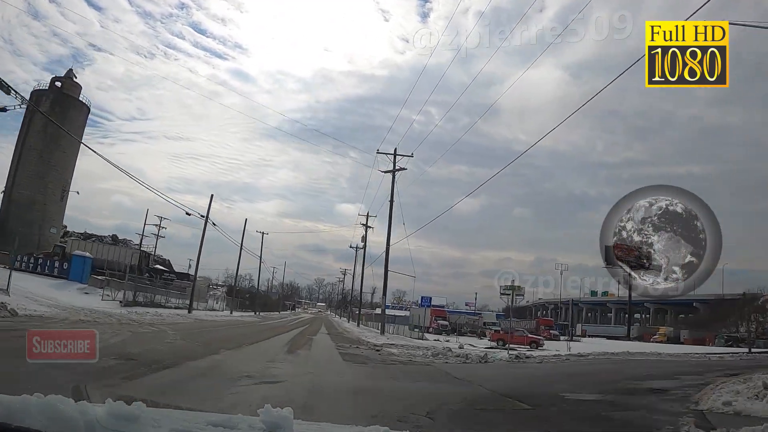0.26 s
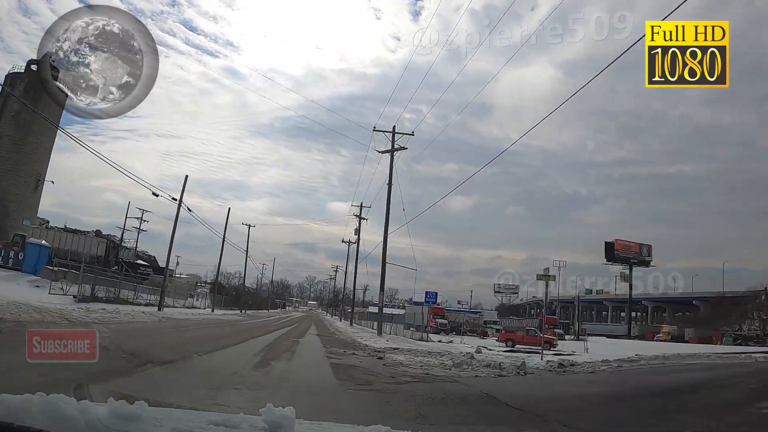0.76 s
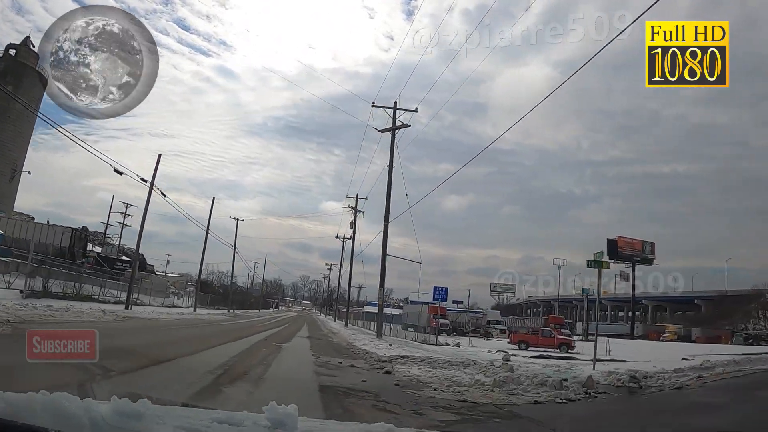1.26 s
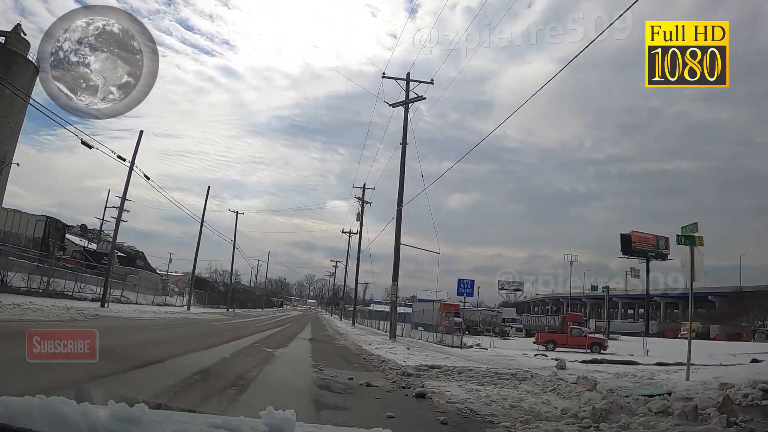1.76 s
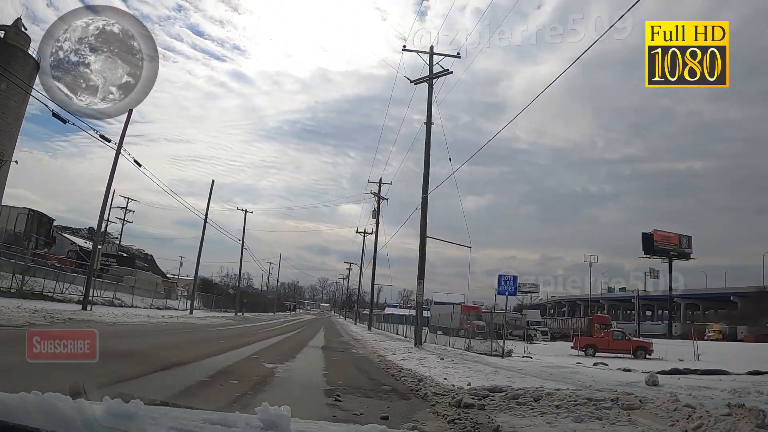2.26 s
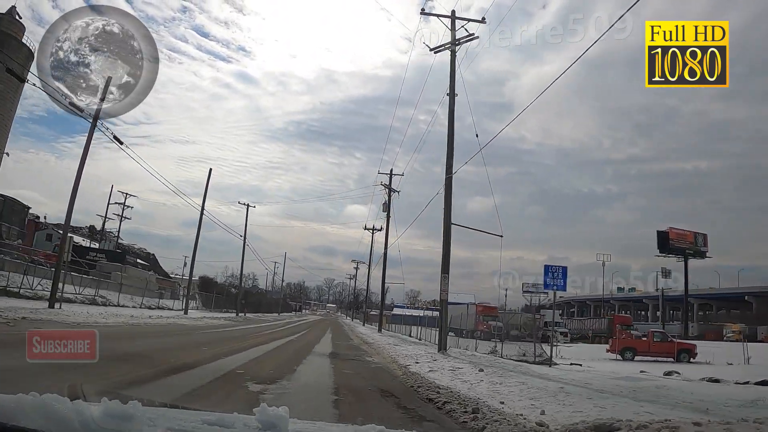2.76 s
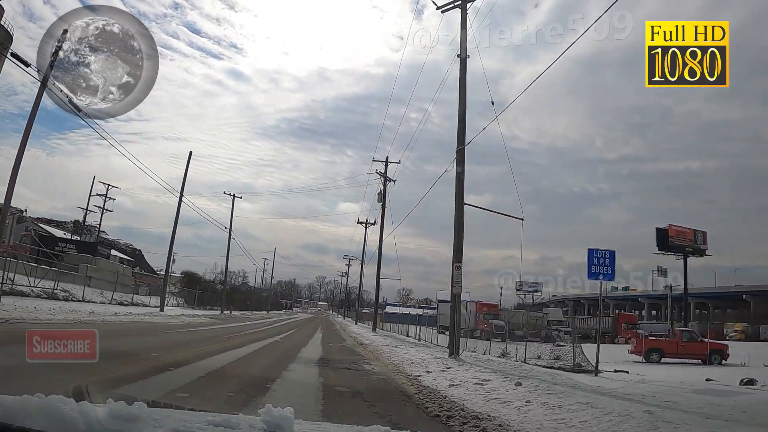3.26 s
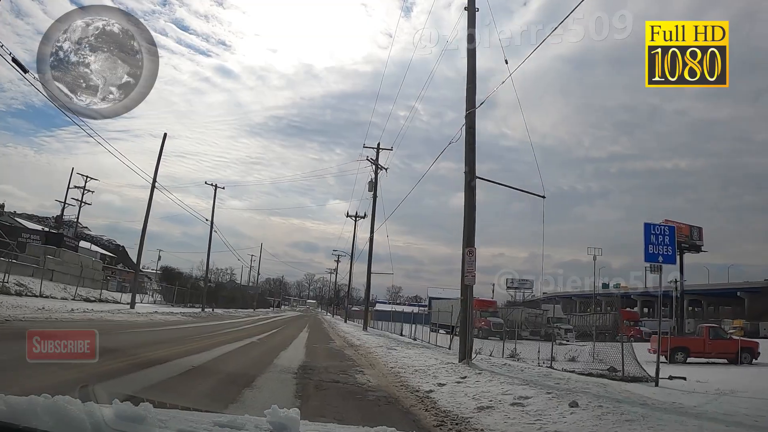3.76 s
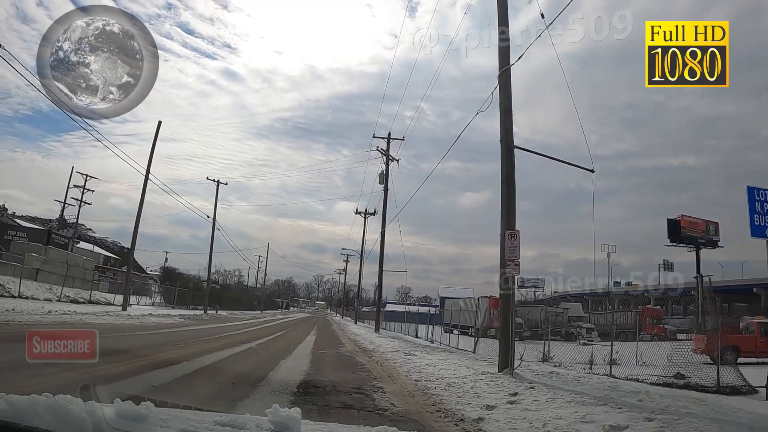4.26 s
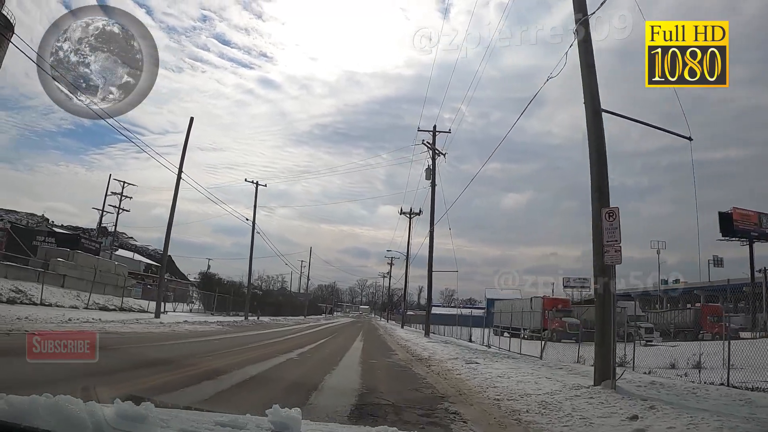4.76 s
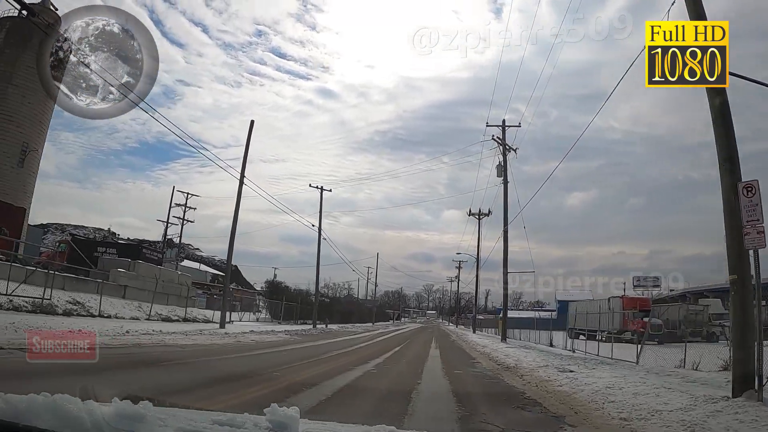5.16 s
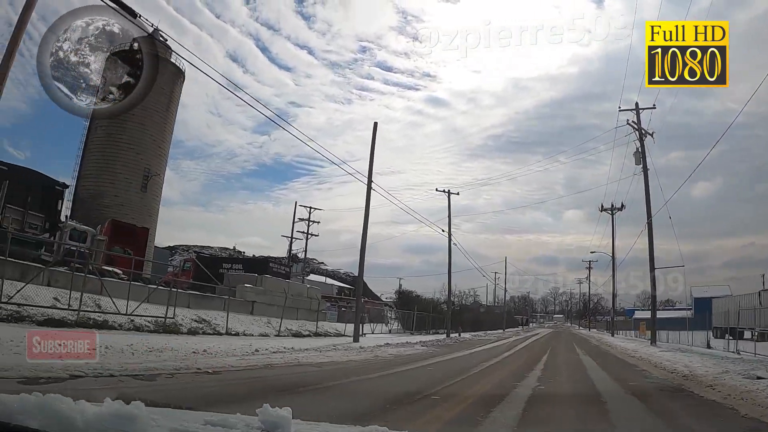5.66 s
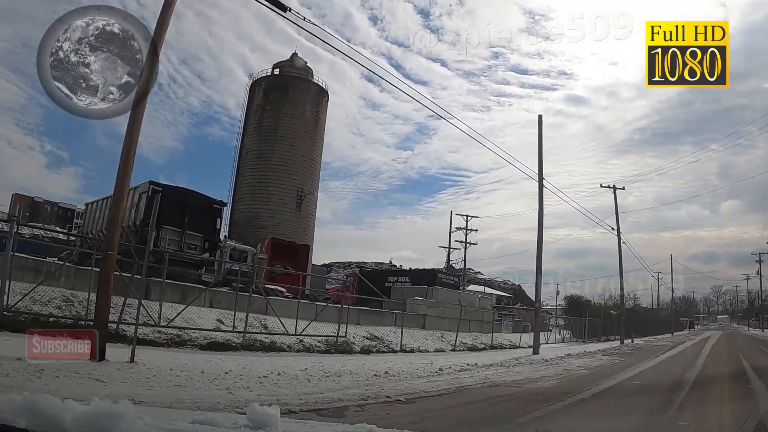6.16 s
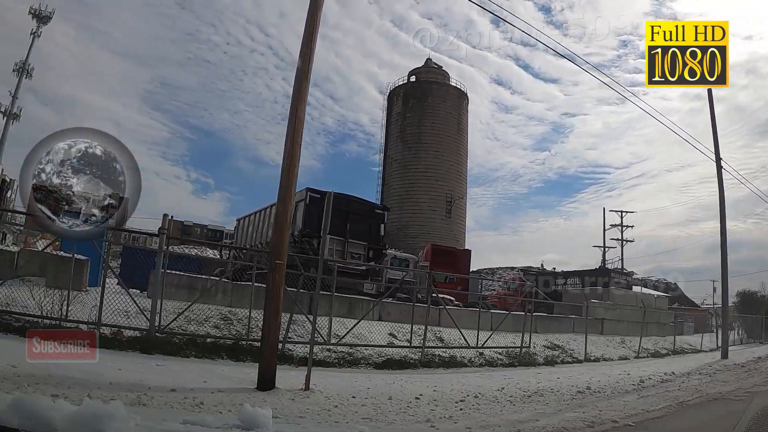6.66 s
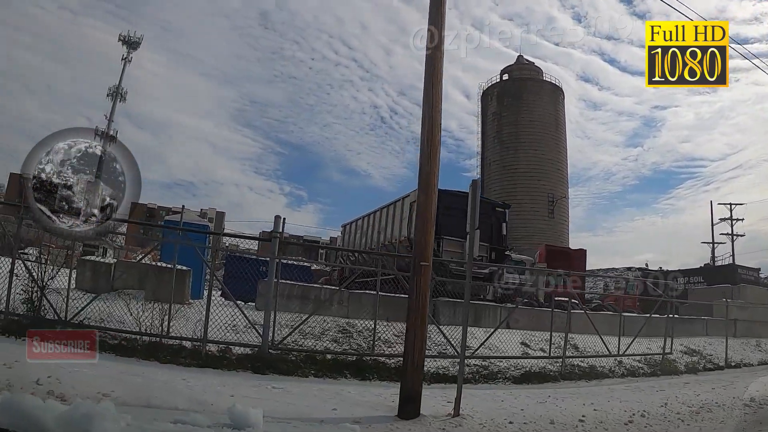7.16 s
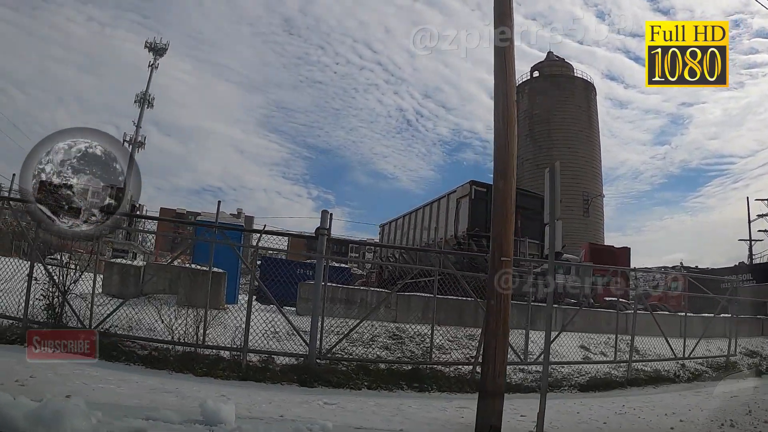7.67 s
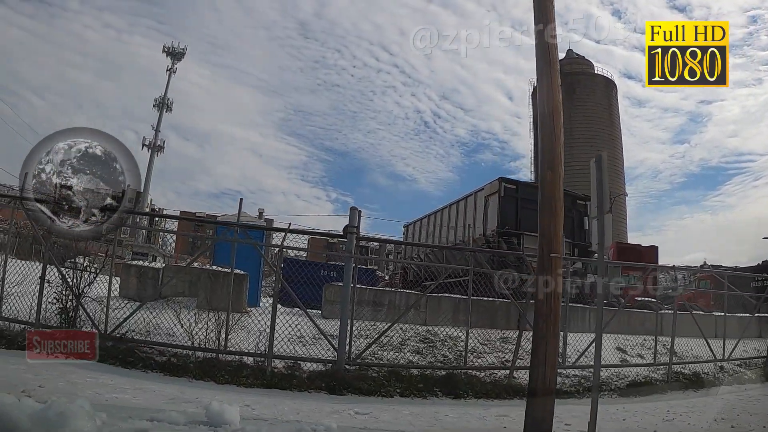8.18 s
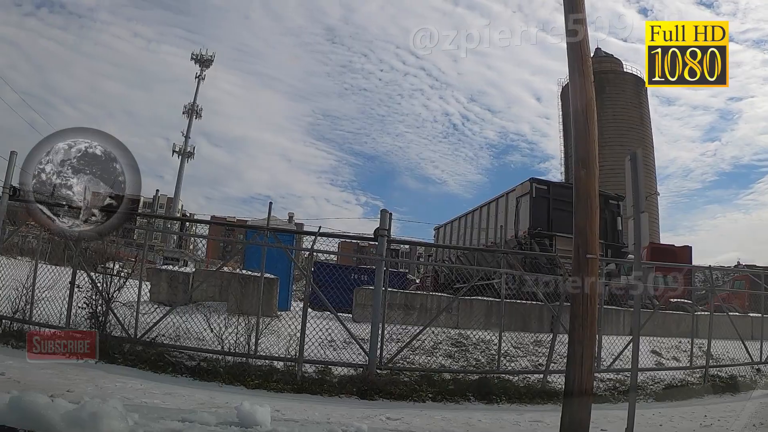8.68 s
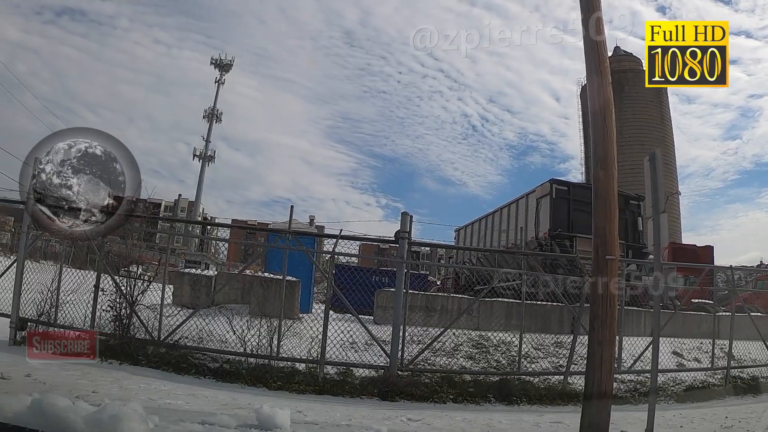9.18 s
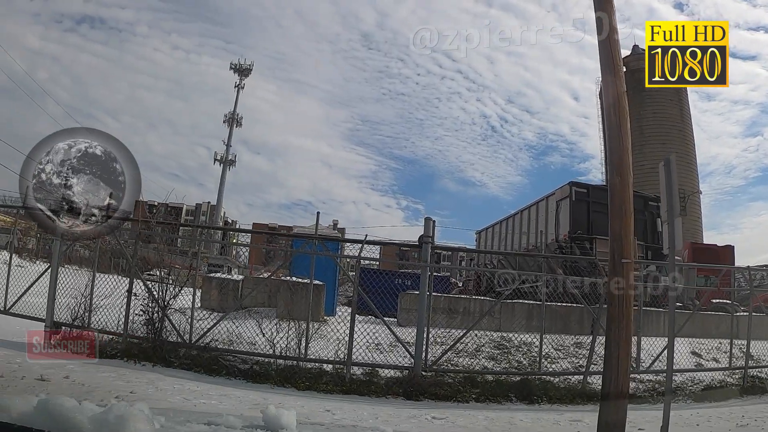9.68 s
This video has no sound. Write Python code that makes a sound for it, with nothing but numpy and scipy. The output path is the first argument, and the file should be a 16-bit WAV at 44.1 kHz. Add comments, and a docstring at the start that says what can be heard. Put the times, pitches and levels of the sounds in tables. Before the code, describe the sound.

A microphone in a small, padded car cabin catches boomy low engine hum, dull tyre roar and very faint slush hiss. Early on there are only isolated ticks, knocks and soft rubbing, with faint seat creaks after three seconds. A sharper knock comes just after five. During a late tight turn, palms slide over the wheel; bumps jolt the body around eight, a loud plastic snap follows, and the engine picks up at the end.

```python
"""Inside a car on a slushy road: a low engine drone, cabin boom, tyre rumble and slush hiss run throughout.
From the first second the body knocks, the dash ticks, trim snaps, the column clacks and the wheel rubs.
The seat creaks at 3 s; the engine sinks as the car slows; from 7 s, in a tight turn, the rim keeps sliding.
Around 8 s bumps bring knocks, jolts, rattles and clinks; near the end the rim squeaks and the engine rises.
Engine: summed sine orders. Road and rub: shaped noise. Hits: decaying modes with scattered reflections."""
import sys
import numpy as np
from scipy import signal
from scipy.fft import rfft, irfft, next_fast_len
from scipy.io import wavfile
from scipy.ndimage import uniform_filter1d

SR = 44100
rng = np.random.default_rng(int(sys.argv[2]) if len(sys.argv) > 2 else 0)


def output_pcm(signal):
    """Save a mono or channel-first signal as 16-bit PCM at the path in sys.argv[1].

    Samples are clipped to [-1, 1] before scaling.
    """
    pcm = np.clip(np.atleast_2d(signal).T, -1, 1) * 32767
    wavfile.write(sys.argv[1], SR, np.round(pcm).astype(np.int16))


N = 437913
TIME = np.arange(N) / SR

# Mean engine speed. Each row: time in seconds, firings per second.
FIRING_RATE = [(0, 41.1), (.8, 31.9), (1.1, 37.7), (1.5, 37.1), (2.0, 33), (2.6, 30.7), (3.1, 30.5),
               (3.5, 31.8), (3.75, 30.3), (4.15, 34.2), (4.6, 30.8), (5.0, 29.5), (5.5, 29.8), (6.1, 32.3),
               (6.6, 32), (7.1, 29), (8.3, 27.6), (8.7, 27.7), (9.2, 25.9), (9.8, 33.7), (9.93, 32.3)]
# Drone level. Each row: time in seconds, relative level in dB.
DRONE_LEVEL = [(0, -19), (.2, -28), (.35, -18.5), (.95, -20.5), (1.12, -28.5), (1.24, -16.5), (1.33, -22.5),
               (1.43, -15.5), (1.53, -25), (1.63, -19.5), (1.71, -26.5), (1.8, -19), (2.2, -22), (2.8, -26),
               (3.5, -24), (4.3, -23.5), (4.9, -25), (5.14, -37), (5.6, -32), (5.72, -24), (5.87, -24),
               (6.2, -31), (6.33, -23.5), (6.55, -30.5), (6.9, -31), (7.2, -27.5), (8, -26), (8.7, -26),
               (8.95, -36), (9.15, -23.5), (9.4, -32), (9.6, -21.5), (9.82, -16), (9.93, -20)]
# Cabin boom. Each row: time in seconds, relative level of the second order in dB, of the third in dB.
BOOM_LEVEL = [(0, -39.5, -38), (1.2, -27.5, -31), (1.8, -35, -37.5), (2.5, -33, -31.5), (3.2, -32, -31.5),
              (3.7, -32, -26), (4.1, -26, -32), (4.45, -36, -30.5), (4.9, -27.5, -33), (5.45, -26, -34.5),
              (5.8, -31, -36), (6.7, -30, -36), (7.5, -36, -42), (8.5, -35.5, -41), (9.2, -39, -45),
              (9.93, -32, -36.5)]
# Upper orders. Each row: multiple of the firing rate, level against the drone in dB.
UPPER_ORDERS = [(4, -23.5), (5, -21), (6, -25)]


def engine(level_db=-1.5, boom_db=-2.5, waver_db=1.42, surge_db=1.5, wander_hz=0.793):
    """Orders of an unsteady firing rate; the drone surges, the cabin booms, each order wavers on its own."""
    firing_hz, = in_time(FIRING_RATE)
    drone_db, = in_time(DRONE_LEVEL)
    second_db, third_db = in_time(BOOM_LEVEL)
    phase = 2 * np.pi * np.cumsum(firing_hz + wander_hz * drift(9)) / SR
    drone_db = drone_db + level_db + surge_db * drift(12)
    orders = [(1, drone_db), (2, second_db + boom_db), (3, third_db + boom_db)]
    orders += [(k, drone_db + db) for k, db in UPPER_ORDERS]
    out = 0
    for k, db in orders:
        gain = from_db(db + waver_db * drift(6.4))
        out = out + gain * np.sin(k * phase + rng.uniform(0, 2 * np.pi))
    return np.sqrt(2) * out


# Steady rolling. Each row: time in seconds, relative rumble level in dB, relative tyre roar level in dB.
ROAD_LEVEL = [(0, -31, -41.5), (.25, -26, -41.5), (1.1, -26.5, -43), (1.7, -29, -46), (3.3, -25, -43.5),
              (4.4, -28, -44), (5.2, -29, -44.5), (5.7, -27, -43.5), (6.8, -28, -44.5), (7.5, -31, -42.5),
              (8.2, -31, -45), (9, -32.5, -43.5), (9.93, -32.5, -43.5)]
# Rough packed snow. Each row: middle in seconds, length in seconds, swell in dB.
SNOW_PATCHES = [(0.878, 0.2, 3.5), (1.128, 0.26, 5.5), (2.768, 0.5, 3), (3.747, 0.26, 2),
                (5.606, 0.47, 0.5), (6.352, 0.14, 6), (7.995, 0.48, 4), (8.494, 0.5, 2), (9.896, 0.059, 7)]
# Spectra of body rumble, tyre roar, slush. Each row: frequency in Hz, relative density in dB per Hz.
RUMBLE_SPECTRUM = [(10, -23), (20, -6.5), (30, -1.5), (42, 2), (65, -0.5), (80, -4.5), (97, -3),
                   (125, -8.5), (150, -11), (185, -11.5), (230, -26), (330, -51)]
ROAR_SPECTRUM = [(130, -27.5), (210, 3), (270, -0.5), (400, -7.5), (560, -8.5), (680, -12.5), (800, -14),
                 (1100, -18), (1700, -25), (3000, -42)]
SLUSH_SPECTRUM = [(600, -10.5), (1000, -2.5), (1500, -5), (2000, -9), (2750, -10.5), (3300, -23),
                  (4100, -29), (4400, -23), (4620, -23), (5000, -25), (6500, -25.5), (9000, -31.5),
                  (12000, -50.5), (16000, -49)]
# Air modes of the cabin. Each row: frequency in Hz, width in Hz, boost in dB.
AIR_MODES = [(336.4, 50, 6.5), (388.7, 30, 7), (472, 25, 2.5), (574, 26, 5.5), (628, 30, 6.5),
             (669, 40, 10.5)]
ROAR_FOLLOWS = 0.4   # share of a patch's dB swell


def tyres(rumble_db=1.57, roar_db=-0.02, slush_db=-62.5, spray_db=-6.0, steadiness=0.74):
    """Roughness shakes the body, tread roars in the cabin's air modes, slush spatters beneath."""
    rumble_curve_db, roar_curve_db = in_time(ROAD_LEVEL)
    patch_db = 0
    for middle, length, db in SNOW_PATCHES:
        patch_db = patch_db + db * np.cos(np.pi * np.clip((TIME - middle) / length, -.5, .5))
    rumble = coloured(white(), RUMBLE_SPECTRUM)
    power = uniform_filter1d(rumble[0] ** 2, SR // 6)
    rumble = rumble / power ** (steadiness / 2)   # evens out the shaking
    roar = coloured(white(), ROAR_SPECTRUM, AIR_MODES)
    spatter = rms_one(white() + from_db(spray_db) * grains(410, 1.6))
    slush = coloured(spatter, SLUSH_SPECTRUM)
    rumble_gain = from_db(rumble_curve_db + patch_db + rumble_db)
    roar_gain = from_db(roar_curve_db + ROAR_FOLLOWS * patch_db + roar_db)
    return rumble_gain * rumble + roar_gain * roar + from_db(slush_db) * slush


# Strokes on the wheel. Each row: start in seconds, length in seconds, relative level in dB,
# brightness in dB per octave, attack as share of length, rasp centre in Hz, rasp against stroke in dB.
WHEEL_STROKES = [(0.995, 0.67, -62.5, 0.5, 0.3, 1290, -13), (2.45, 0.54, -55.5, -0.3, 0.47, 1750, -3),
                 (3.97, 0.35, -58, -1.5, 0.18, 1300, -16), (4.278, 0.37, -53.5, 1.4, 0.34, 2730, 3.5),
                 (4.6, 1.1, -55, 2.1, 0.55, 1500, -11), (5.509, 0.25, -42, -0.3, 0.47, 1110, -3),
                 (5.8, 0.64, -62.5, 2.5, 0.13, 1300, -16), (7.07, 0.52, -45.5, -0.6, .42, 1250, -4),
                 (7.429, 0.28, -44.5, 0, 0.44, 1480, -6), (7.83, 0.38, -52.5, 1.5, 0.073, 1650, -19),
                 (7.876, .028, -53, 5.5, .3, 4900, 7), (8.277, 0.09, -52, 0.5, 0.45, 2000, -1),
                 (8.347, 0.14, -53, 4, 0.34, 3000, 6), (8.488, 0.115, -41.5, 1.1, 0.36, 1250, -11),
                 (8.725, 0.077, -47.5, 4, 0.23, 1080, 4.5), (8.787, 0.37, -57, -8, 0.26, 1300, -16),
                 (9.205, 0.068, -41.5, -2.7, 0.55, 1003, -11), (9.279, 0.18, -43.5, 1.3, 0.3, 1400, -3.5),
                 (9.587, 0.18, -48.5, 3.5, 0.24, 1040, 4)]
# Light sliding through the turn: relative level, brightness in dB per octave.
TURN_START_S, TURN_ONSET_S, SLIDE_DB, SLIDE_BRIGHT_DB = 7.1, 1, -56, 2
SIZZLE_FOLLOWS = 0.46   # share of a stroke's dB swell


def stroking():
    """Body, sizzle, rasp gain and rasp Hz: strokes swell and let go; overlaps add in power."""
    body = from_db(2 * SLIDE_DB) * np.clip((TIME - TURN_START_S) / TURN_ONSET_S, 0, 1)
    sizzle = body * from_db(4 * SLIDE_BRIGHT_DB)   # two octaves up, in power
    rasp, pitch = 1e-18, 0
    for start, length, db, bright_db, attack, hz, rasp_db in WHEEL_STROKES:
        shape = swell(start, length, attack) ** 2
        body = body + from_db(db) ** 2 * shape
        sizzle = sizzle + from_db(db + 2 * bright_db) ** 2 * shape ** SIZZLE_FOLLOWS
        grip = from_db(db + rasp_db) ** 2 * shape
        rasp = rasp + grip
        pitch = pitch + grip * hz
    return np.sqrt(body), np.sqrt(sizzle), np.sqrt(rasp), np.maximum(pitch / rasp, 500)


# Plain rub spectrum. Each row: frequency in Hz, relative density in dB per Hz.
RUB_SPECTRUM = [(350, 1), (780, -4), (1010, 1.5), (1200, 0), (1600, -4.5), (2200, -7), (3200, -9.5),
                (3900, -17.5), (5000, -16), (6600, -18.5), (7800, -23), (9000, -23), (11000, -34),
                (15500, -39.5)]
# Wheel and column resonances. Each row: frequency in Hz, width in Hz, mean level over the plain rub in dB.
WHEEL_RESONANCES = [(975, 150, 2.5), (1357, 19, 1.5), (1570, 99, 0.5), (1814, 90, -0.5), (3260, 260, -14.5),
                    (3860, 62, -5), (6180, 160, -13)]
GRIP_Q, GRIP_WANDER_OCTAVES = 4.6, 0.13


def wheel_rub(level_db=-1.0, grain_db=-9.0, flutter_db=1.46, grip_db=3.5, split_hz=2600,
              pan_db=-1.0, sizzle_pan_db=-1.5):
    """Friction under the grip excites wheel and column: dull body, sizzle on top, rasp that shifts."""
    pressure, sizzle_gain, rasp_gain, rasp_hz = stroking()
    plain = coloured(white() + from_db(grain_db) * grains(4000, 4.8), RUB_SPECTRUM)
    rings = 0
    for hz, width, db in WHEEL_RESONANCES:
        # the moving grip damps each resonance now more, now less
        rings = rings + from_db(db + grip_db * drift(9)) * resonance(plain, hz, hz / width)
    friction = rms_one(plain + rings)
    dull = signal.sosfiltfilt(signal.butter(2, split_hz, fs=SR, output="sos"), friction)
    sizzle = (friction - dull) * sizzle_gain * from_db(flutter_db * drift(30))
    rasp_hz = rasp_hz * 2 ** (GRIP_WANDER_OCTAVES * drift(14))
    rasp = rasp_gain * gliding_resonance(friction, rasp_hz, GRIP_Q)
    rub = panned(pressure * dull + rasp, pan_db) + panned(sizzle, sizzle_pan_db)
    return from_db(level_db + flutter_db * drift(45)) * rub


# Rim squeaks. Each row: start in seconds, length in seconds, pitch in Hz, relative level in dB.
RIM_SQUEAKS = [(8.727, .085, 6270, -55), (8.735, .075, 6910, -56), (8.755, .062, 3900, -52),
               (9.585, .14, 6290, -59), (9.595, .125, 6820, -60)]
SQUEAK_WIDTH_HZ, SQUEAK_ATTACK = 78, 0.14   # width of each of two passes; attack as share of length


def squeaks(level_db=-4.5):
    """Where the rim slips fast, friction makes thin unsteady whistles: narrow bands of noise."""
    friction = white()
    out = 0
    for start, length, hz, db in RIM_SQUEAKS:
        q = hz / SQUEAK_WIDTH_HZ
        whistle = rms_one(resonance(resonance(friction, hz, q), hz, q))
        out = out + from_db(db + level_db) * swell(start, length, SQUEAK_ATTACK) * whistle
    return out


# Column clacks. Each row: time in seconds, relative peak in dB, left over right in dB,
# rebound delay in seconds, rebound against first contact in dB.
COLUMN_CLACKS = [(1.0454, -34.5, -8, 0.0046, -3), (2.3468, -30, -7, 0.012, 0),
                 (4.1195, -30, -6, 0.012, -0.5), (4.7301, -38, -8, 0.014, -18), (6.117, -44, -1, .012, -8),
                 (6.2766, -37, 2, .012, -9), (7.4385, -29, -10, 0.004, -5), (8.5418, -23.5, -6, 0.005, -3),
                 (9.4763, -23.5, -7, 0.01, -4)]
# Column ring. Each row: mean frequency in Hz, mean relative level in dB, t60 in seconds.
COLUMN_MODES = [(940, -1.5, 0.04), (1030, -7.5, 0.038), (1567, 6, 0.041), (1730, 7, 0.034),
                (1977, 3, 0.034), (2120, -2.5, 0.02), (2360, -13.5, 0.025)]


def column_clacks():
    """Steering column contacts, each with a rebound; modes start in step."""
    contacts = []
    for s, db, pan_db, delay, rebound_db in COLUMN_CLACKS:
        contacts += [(s, db, pan_db), (s + delay, db + rebound_db, pan_db)]
    return struck(contacts, COLUMN_MODES, level_db=4.0, contact_hz=2400, scatter_db=-5.0,
                  scatter_t60=0.054, crack_db=-29.5, hard=True)


# Dashboard ticks. Each row: time in seconds, relative peak in dB, left over right in dB.
DASH_TICKS = [(0.842, -28.5, -1), (1.8512, -31, -1), (1.9525, -31, 0), (3.2779, -31, -2),
              (3.3408, -34.5, -1), (4.6399, -28, 0), (4.781, -39, 4), (4.9546, -28, 1),
              (5.032, -31.5, -5.5), (5.2802, -34, 0), (6.3016, -31.5, 0), (6.353, -32, 2),
              (7.8525, -29, -2), (7.985, -30, -3), (8.007, -24, 0), (8.507, -32, -1), (8.6163, -29.5, -2),
              (8.622, -33, -2), (9.2211, -48, 0), (9.8944, -22.5, 2)]
# Dashboard ring. Each row: mean frequency in Hz, mean relative level in dB, t60 in seconds.
DASH_MODES = [(320, 5.5, 0.024), (957, -7, 0.094), (1132, 1, 0.021), (1200, 7, 0.021), (1450, 2.5, 0.015),
              (2040, -0.5, 0.014), (2550, -6, 0.027), (3380, -15.5, 0.0081), (8050, -25, .004)]


def dash_ticks():
    """Small contacts ring the dashboard's short modes."""
    return struck(DASH_TICKS, DASH_MODES, level_db=0.5, contact_hz=6000, scatter_db=-8.5,
                  scatter_t60=0.11, crack_db=-19.0)


# Trim snaps. Each row: time in seconds, relative peak in dB, left over right in dB, pitch in Hz,
# bright edge boost in dB.
SNAP_EVENTS = [(0.8435, -35, -2, 2050, -0.5), (1.3328, -47, -1, 1900, 2), (3.2776, -36, -1.5, 2054, -5),
               (4.1888, -32, -9, 1900, -10), (4.2146, -42.5, -7, 1920, -6), (6.5853, -31, -4, 2200, 1.5),
               (6.6048, -29, 1, 2628, 3), (6.7369, -30, -1.5, 2483, 2), (7.1443, -36, -5, 2200, -8),
               (7.962, -32, -5, 2500, 18), (8.3734, -34, 1, 2530, -3), (8.8550, -16.5, -9, 2150, 2),
               (8.9528, -38, -7, 1950, -4)]
# Ring around the snap's pitch. Each row: multiple of the pitch, mean relative level in dB, t60 in seconds.
TRIM_MODES = [(.3, -15, .014), (.52, -12, .014), (.8, -6, .008), (1, 0, .015), (1.2, -3, .007),
              (1.45, -8, .005)]
# Thin edge of the trim. Each row: mean frequency in Hz, level before the edge boost in dB, t60 in seconds.
EDGE_MODES = [(3880, -14.5, 0.0042), (5000, -18.5, .005), (6200, -18.5, 0.0044), (8100, -20.5, 0.0065)]


def trim_snaps():
    """Plastic rings briefly around its own pitch; the edge boost brings out thin high modes."""
    out = 0
    for s, db, pan_db, pitch_hz, edge_db in SNAP_EVENTS:
        modes = [(k * pitch_hz, mode_db, t60) for k, mode_db, t60 in TRIM_MODES]
        modes += [(hz, mode_db + edge_db, t60) for hz, mode_db, t60 in EDGE_MODES]
        out = out + struck([(s, db, pan_db)], modes, level_db=1.0, contact_hz=7000, scatter_db=2.5,
                           scatter_t60=0.043, crack_db=-17.5)
    return out


# Body knocks. Each row: time in seconds, relative peak in dB, left over right in dB.
BODY_KNOCKS = [(.662, -24, 0), (3.751, -28.5, -1.5), (5.031, -28.5, -1), (5.2415, -20.5, 1),
               (7.853, -28, 0), (7.88, -29, -3), (8.006, -16.5, 0), (8.018, -20.5, -1), (8.296, -26.5, 0),
               (8.326, -29, -1), (8.342, -29, 1), (8.372, -22, 0), (8.452, -20.5, -2), (8.462, -18.5, -1),
               (8.473, -29, 0), (8.617, -27, 2)]
# Body ring. Each row: mean frequency in Hz, mean relative level in dB, t60 in seconds.
BODY_MODES = [(305.4, 0, 0.081), (372, -3.5, 0.085), (475, -6, 0.1), (564, 1.5, 0.034), (573, -1.5, 0.017),
              (753, -12.5, 0.093), (920, -12, 0.082)]


def body_knocks():
    """Dull knocks ring the low modes of the body."""
    return struck(BODY_KNOCKS, BODY_MODES, level_db=-0.5, contact_hz=1500, scatter_db=-16.0,
                  scatter_t60=0.07, crack_db=-23.5)


# Suspension jolts. Each row: time in seconds, relative peak in dB, left over right in dB.
JOLT_EVENTS = [(7.875, -25, 0), (8.005, -22, 0), (8.374, -18, 0), (8.426, -21, 0), (8.452, -19, 0),
               (8.482, -17, 0), (8.616, -22, 0), (9.888, -19, 0)]
# Suspension ring. Each row: mean frequency in Hz, mean relative level in dB, t60 in seconds.
SUSPENSION_MODES = [(118.4, 5.5, 0.43), (188, 5, 0.087), (234, 0, 0.071)]


def suspension_jolts():
    """Soft, low thumps through the suspension."""
    return struck(JOLT_EVENTS, SUSPENSION_MODES, level_db=2.0, contact_hz=400, scatter_db=-18.0,
                  scatter_t60=.08)


# Rattles over bumps. Each row: start in seconds, length in seconds, relative level in dB.
RATTLE_EVENTS = [(0.656, 0.033, -46), (5.242, 0.017, -37.5), (7.85, 0.047, -38.5), (7.992, 0.052, -33),
                 (8.294, 0.056, -41), (8.36, 0.035, -39.5), (8.428, 0.078, -35), (8.614, 0.025, -38)]
# Rattle spectrum. Each row: frequency in Hz, relative density in dB per Hz.
LOOSE_SPECTRUM = [(200, -1), (350, 2), (620, -2), (900, -9), (1500, -16), (2600, -21), (3600, -36)]


def rattles(level_db=-2.5, per_s=260, spread_db=-0.5, attack=0.13, ring_t60=0.021):
    """Bumps shake loose parts into runs of small contacts, each a short noise ring."""
    t = TIME[:SR // 10]
    ring = rng.standard_normal((2, len(t))) * from_db(-60 * t / ring_t60)
    contacts = signal.oaconvolve(grains(per_s, spread_db), ring, axes=1)[:, :N]
    chatter = coloured(contacts, LOOSE_SPECTRUM)
    return chatter * sum(from_db(db + level_db) * swell(start, length, attack)
                         for start, length, db in RATTLE_EVENTS)


# Metal clinks at the bump. Each row: time in seconds, relative peak in dB, left over right in dB.
CLINK_EVENTS = [(7.962, -36.5, -10), (8.004, -26, -6)]
# Metal ring. Each row: mean frequency in Hz, mean relative level in dB, t60 in seconds.
METAL_MODES = [(2890, 3, 0.016), (3980, -1, 0.013), (4240, -2.5, 0.025), (4547, -3, 0.02), (5480, -7, 0.02)]


def metal_clinks():
    """Something metal rings its high modes as the car hits the bump."""
    return struck(CLINK_EVENTS, METAL_MODES, level_db=2.0, contact_hz=5500, scatter_db=4.0,
                  scatter_t60=0.031)


# Seat creaks. Each row: time in seconds, relative peak in dB, left over right in dB.
CREAK_EVENTS = [(3.228, -40, 1), (3.245, -43.5, -4), (3.612, -35, 1), (3.626, -39, -4), (9.601, -34, -1),
                (9.636, -29, -1), (9.655, -34, -1)]
# Seat ring. Each row: mean frequency in Hz, mean relative level in dB, t60 in seconds.
SEAT_MODES = [(720, -12, 0.049), (965, 4.5, 0.12), (2350, -10.5, .04)]


def seat_creaks():
    """Close runs of soft contacts ring the seat."""
    return struck(CREAK_EVENTS, SEAT_MODES, level_db=-3.5, contact_hz=3000, scatter_db=-9.0,
                  scatter_t60=.06)


# Cabin whine. Each row: time in seconds, level in dB.
WHINE_LEVEL = [(0, -81), (2.5, -81), (3.2, -77.5), (6, -77.5), (6.8, -75), (7.5, -78), (9.93, -80)]
WHINE_HZ, WHINE_Q = 4623, 18   # Q of each of two passes


def whine():
    """A thin whistle under the road noise: noise through one resonance twice."""
    level_db, = in_time(WHINE_LEVEL)
    narrow = resonance(resonance(white(), WHINE_HZ, WHINE_Q), WHINE_HZ, WHINE_Q)
    return from_db(level_db) * rms_one(narrow)


def struck(events, modes, level_db, contact_hz, scatter_db, scatter_t60, crack_db=-60, hard=False):
    """Contacts crack and ring modes of uneven strength; hard starts them in step. Surfaces scatter it."""
    out, t = np.zeros((2, N + SR)), TIME[:SR // 5]
    hz, mode_db, t60 = np.transpose(modes)[:, :, None]
    softness = signal.butter(2, contact_hz, fs=SR, output="sos")
    crack_band = signal.butter(1, [1300, 3600], "band", fs=SR, output="sos")
    for s, peak_db, pan_db in events:
        polarity = 1 if hard else rng.choice([-1, 1], hz.shape)
        strength = from_db(mode_db + rng.normal(0, 0.92, hz.shape)) * polarity
        detune = 1 + rng.normal(0, 0.018, hz.shape)
        partials = strength * from_db(-60 * t / t60) * np.sin(2 * np.pi * hz * detune * t)
        ring = partials.sum(axis=0)
        paths, crack = rng.standard_normal((2, 2, len(t))) * from_db(-60 * t / scatter_t60)
        paths *= from_db(scatter_db) / np.linalg.norm(paths[0])
        paths[:, 0] += 1   # direct sound
        hit = rms_one(signal.fftconvolve(paths, ring[None], axes=1)[:, :len(t)])
        hit = hit + from_db(crack_db) * rms_one(signal.sosfilt(crack_band, crack))
        hit = panned(signal.sosfilt(softness, hit), pan_db)
        gain = from_db(peak_db + level_db) / np.abs(hit.mean(axis=0)).max()
        at = int(s * SR)
        out[:, at:at + hit.shape[1]] += hit * gain
    return out[:, :N]


def cabin(x, wet_db, t60, softness):
    """Glass and dashboard reflect a short noise tail, dulled by seats and carpet."""
    t = TIME[:SR // 4]
    tail = signal.lfilter([1], [1, -softness], rng.standard_normal((2, len(t))))
    tail = tail * from_db(-60 * t / t60) * (t > .003)
    tail = tail / np.linalg.norm(tail[0])
    return x + from_db(wet_db) * signal.oaconvolve(x, tail, axes=1)[:, :N]


def from_db(db):
    """Decibels to gain."""
    return 10 ** (np.asarray(db) / 20)


def rms_one(x):
    """Scale to an rms of 1."""
    return x / np.sqrt(np.mean(x ** 2) + 1e-20)


def in_time(rows):
    """Each column of a curve at every sample."""
    s, *columns = np.transpose(rows)
    return [np.interp(TIME, s, c) for c in columns]


def at_hz(points, hz):
    """Read a spectrum on a log-frequency axis."""
    f, value = np.transpose(points)
    return np.interp(np.log(hz), np.log(f), value)


def drift(rate_hz):
    """Random line with rate_hz knots a second; rms 1."""
    knots = rng.standard_normal(int(rate_hz * N / SR) + 2)
    return rms_one(np.interp(TIME * rate_hz, np.arange(len(knots)), knots))


def white():
    """Two unrelated noises."""
    return rng.standard_normal((2, N))


def grains(per_s, spread_db):
    """Tiny random impacts of uneven size; rms 1."""
    sizes = from_db(spread_db * np.minimum(rng.exponential(1, N), 4))
    return rms_one(white() * sizes * (rng.random(N) < per_s / SR))


# Stereo width. Each row: frequency in Hz, side against mid in dB.
STEREO_WIDTH = [(60, -23), (110, -17), (210, -25.5), (390, -18), (740, -10), (1390, -15.5), (2600, -3)]


def coloured(excitation, spectrum, modes=()):
    """Shape (mid, side) noise by spectrum and resonances into left and right; mid rms 1."""
    size = next_fast_len(N, True)
    hz = np.maximum(np.arange(size // 2 + 1) * SR / size, 1)
    level_db = at_hz(spectrum, hz)
    for f, width, boost_db in modes:
        level_db = level_db + boost_db / (1 + (2 * (hz - f) / width) ** 2)
    skirts = np.minimum(1, hz / spectrum[0][0]) ** 2 * np.minimum(1, spectrum[-1][0] / hz) ** 2
    mid, side = rfft(excitation, size) * from_db(level_db) * skirts
    side = side * from_db(at_hz(STEREO_WIDTH, hz))   # long waves reach both sides alike
    mid, side = irfft(np.array([mid, side]), size)[:, :N]
    return np.array([mid + side, mid - side]) / np.std(mid)


def panned(x, pan_db):
    """Tilt towards the left by pan_db."""
    return x * from_db(np.array([[.5], [-.5]]) * pan_db)


STROKE_RELEASE = 0.37   # share of the length


def swell(start, length, attack):
    """Rise over the share attack of the length, hold if time is left, let go."""
    along = (TIME - start) / length
    ramp = np.minimum(along / attack, (1 - along) / STROKE_RELEASE)
    return np.sin(np.pi / 2 * np.clip(ramp, 0, 1))


def resonance(x, hz, q):
    """One resonance, gain 1 on top."""
    return signal.lfilter(*signal.iirpeak(hz, q, fs=SR), x)


def gliding_resonance(x, hz, q, size=256):
    """A resonance whose centre moves, block by block."""
    out, state = np.zeros_like(x), np.zeros((2, 2))
    for i in range(0, N, size):
        b, a = signal.iirpeak(hz[i], q, fs=SR)
        out[:, i:i + size], state = signal.lfilter(b, a, x[:, i:i + size], zi=state)
    return out


def scene():
    """Engine, road and the small noises of the cabin."""
    rolling = panned(engine() + tyres() + whine(), -0.65)
    rub = cabin(wheel_rub() + squeaks(), wet_db=-11.5, t60=0.22, softness=0.47)
    hits = column_clacks() + dash_ticks() + trim_snaps() + metal_clinks() + seat_creaks()
    hits = hits + body_knocks() + rattles()
    hits = cabin(hits, wet_db=-18.5, t60=0.17, softness=0.73)
    return rolling + rub + suspension_jolts() + hits


CUTOFF_HZ = 15700


def record(dry):
    """The right channel lags by two samples; the top is cut steeply."""
    late_right = np.interp(np.arange(N) - 2, np.arange(N), dry[1])
    low_pass = signal.cheby2(12, 70, CUTOFF_HZ, fs=SR, output="sos")
    return signal.sosfilt(low_pass, np.array([dry[0], late_right]))


dry = scene()
out = record(dry)
output_pcm(out)
```